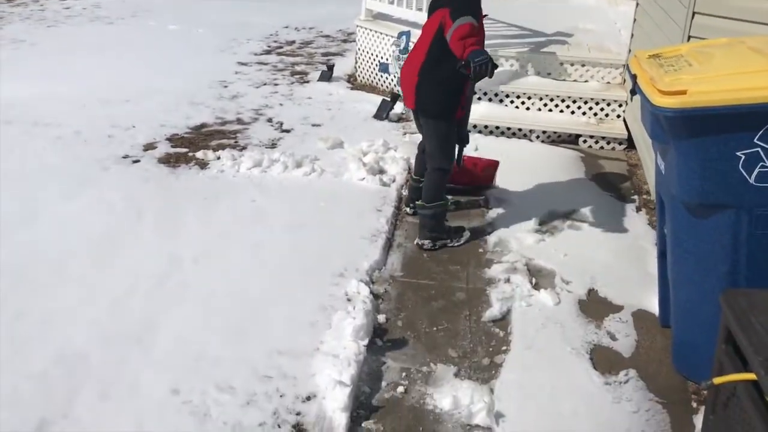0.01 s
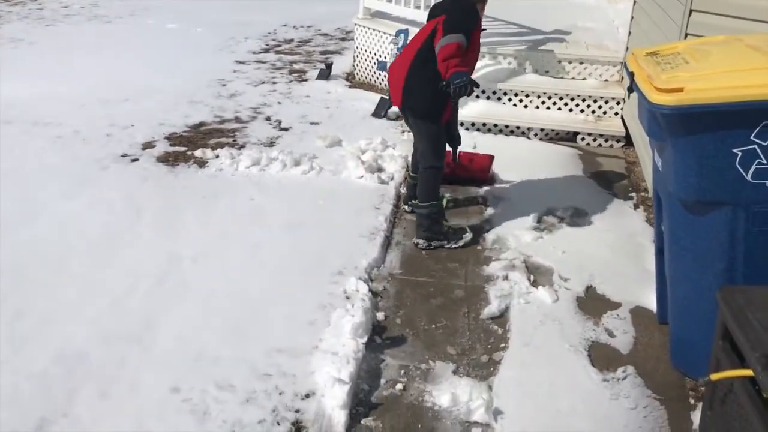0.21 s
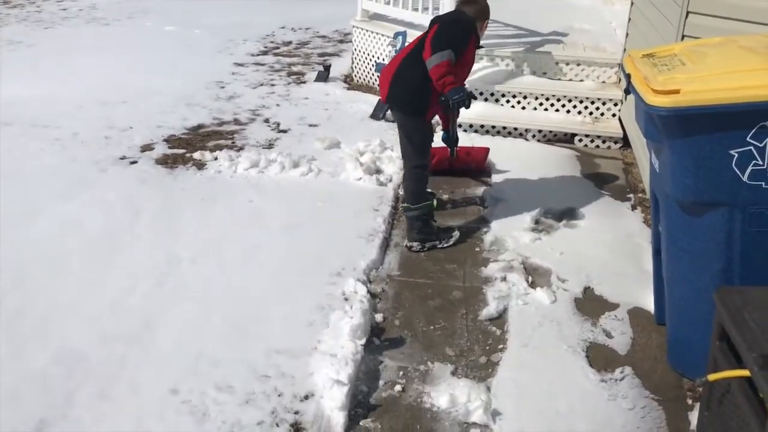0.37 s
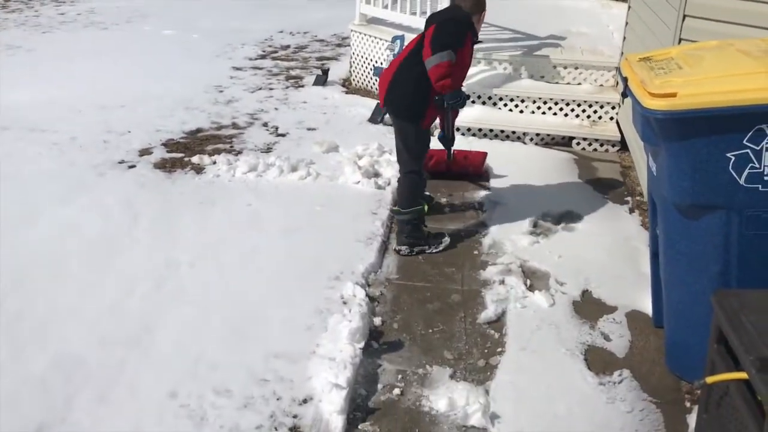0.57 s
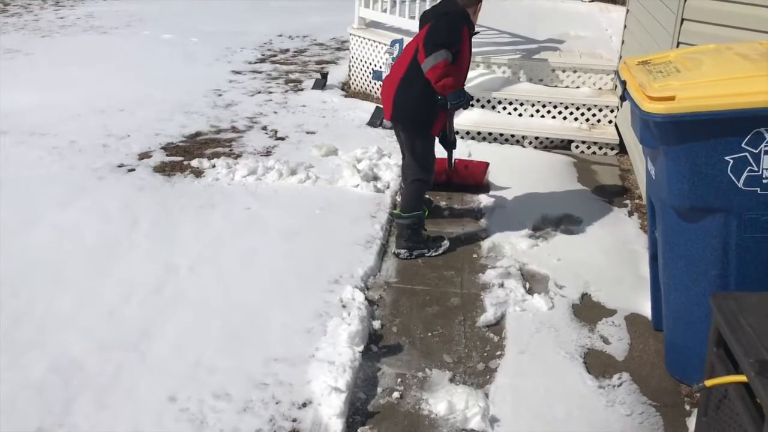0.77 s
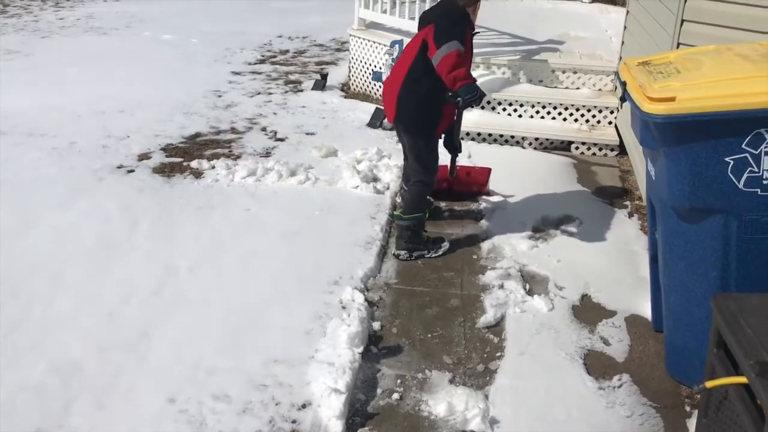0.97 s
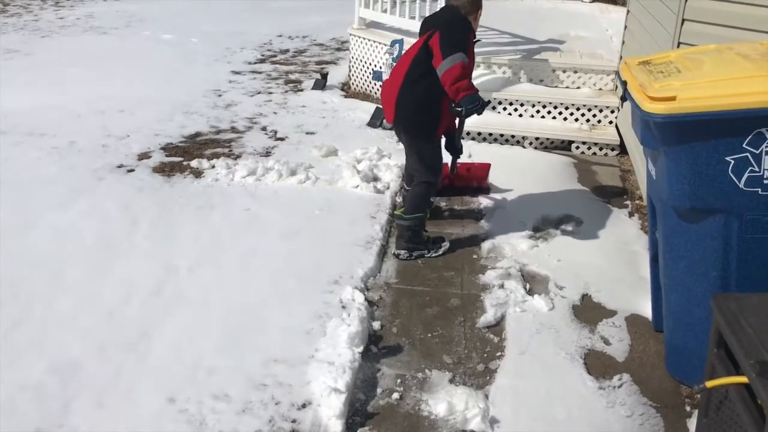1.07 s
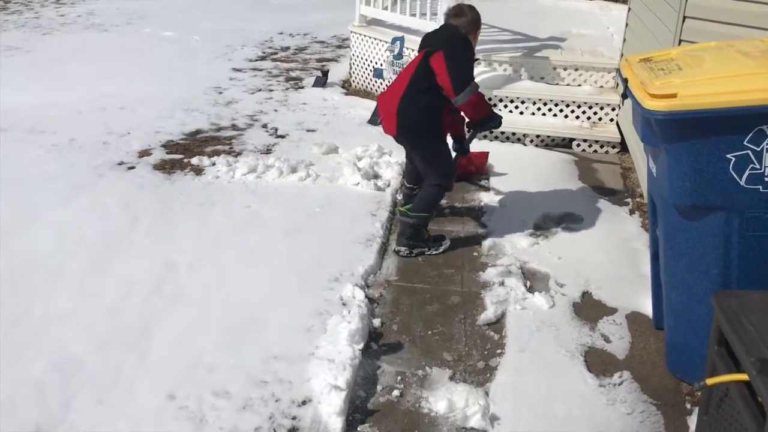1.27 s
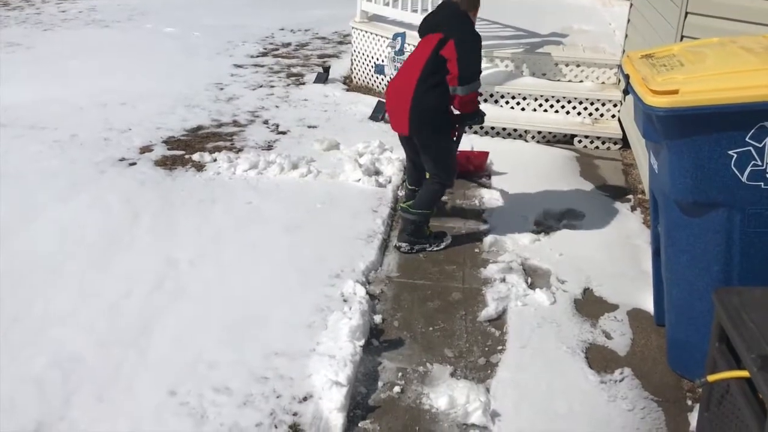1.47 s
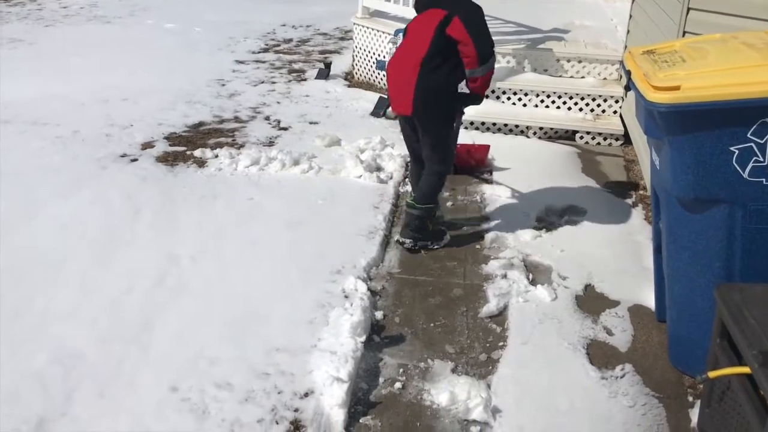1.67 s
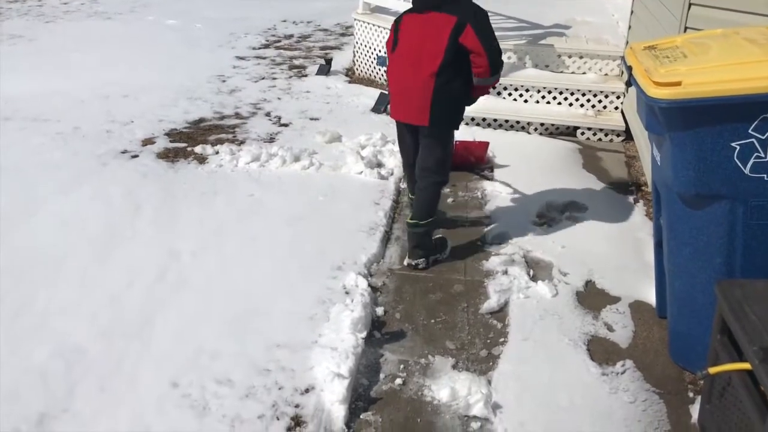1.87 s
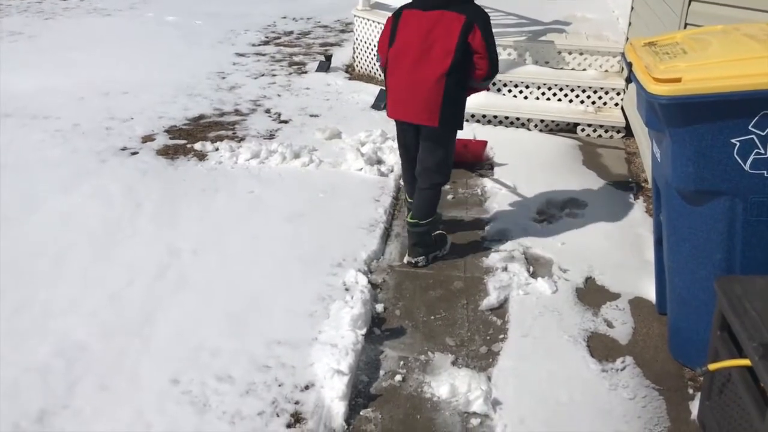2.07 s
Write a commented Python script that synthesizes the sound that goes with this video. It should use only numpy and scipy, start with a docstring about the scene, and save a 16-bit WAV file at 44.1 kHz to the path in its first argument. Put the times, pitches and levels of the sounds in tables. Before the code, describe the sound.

A plastic snow shovel scrapes over gritty concrete from 0.2 to 0.5 seconds, knocking hollowly, with snow swishing off. It drags back lightly and clacks down around 0.9, then shoves again from 1.1 to 1.4. Faint sleeve rustle follows, with two soft boot crunches near 1.7 and 1.9. Light wind bumps the microphone over a faint outdoor wash, strongest from 1.6 to 1.9 seconds.

```python
"""A snowy concrete walk beside a house, with the microphone out in a light wind.
A plastic snow shovel is shoved twice over the walk, and drawn back and set down in between.
Its edge grates on grit and catches on bumps, ringing the scoop; snow swishes off it.
Then nylon sleeves brush a jacket and boots crunch. The house wall throws the sound back,
and gusts buffet the microphone over a faint, distant wash."""
import sys
import numpy as np
from scipy import signal
from scipy.fft import rfft, irfft
from scipy.io import wavfile
from scipy.ndimage import uniform_filter1d

SR = 44100
rng = np.random.default_rng(int(sys.argv[2]) if len(sys.argv) > 2 else 0)


def put_to_file(sound):
    """Save the sound as 16-bit audio at rate SR, in the file named by the first command-line argument."""
    columns = np.atleast_2d(sound).T  # one column per channel
    safe = np.clip(columns, -1, 1)
    whole_steps = np.round(safe * 32767)
    wavfile.write(sys.argv[1], SR, whole_steps.astype(np.int16))


N = 94815

# The plastic scoop's resonances. Each row: frequency in Hz, width in Hz, gain in dB.
SCOOP_MODES = [(255, 61, -2.5), (333.3, 56, 1.5), (408, 68, -8), (596.6, 30, -3), (680, 89, -1),
               (988, 64, 0.5), (1110, 65, -8.5), (1317, 180, -3), (1585, 81, -5), (1954, 120, -6.5),
               (2350, 60, -12.5), (3280, 340, -12.5), (4300, 450, -27), (5930, 2300, -20)]
# How hard the edge grates, one curve per move. Each point: time in seconds, level in dB.
SHOVEL_MOVES = [
    [(0, -49.5), (.028, -46), (.055, -50.5), (.08, -51), (.12, -74)],
    [(.152, -48.5), (.166, -43.5), (.198, -39), (.212, -33), (.245, -29), (.278, -27.5), (.3, -37),
     (.318, -23.5), (.342, -32), (.358, -26), (.375, -34), (.432, -37.5), (.448, -69), (.5, -73), (.6, -83)],
    [(.7, -54), (.745, -46.5), (.767, -40), (.785, -49), (.83, -44), (.875, -54), (.9, -35), (.925, -46),
     (.96, -34), (.992, -49), (1.006, -39.5), (1.025, -47.5), (1.07, -75)],
    [(1.08, -76), (1.092, -43.5), (1.11, -44.5), (1.125, -27.5), (1.148, -32.5), (1.18, -34), (1.203, -30),
     (1.22, -34), (1.237, -32.5), (1.258, -43.5), (1.288, -51), (1.3, -36.5), (1.328, -39.5), (1.355, -80)],
]
# Snow sliding off the scoop, and clothing. Each row: peak time, rise and fall in seconds, level in dB.
SWISHES = [(.015, 0.034, 0.046, -63.5), (0.389, 0.088, 0.039, -40), (0.509, 0.093, 0.053, -48.5),
           (.7, 0.14, 0.059, -57), (.83, 0.057, 0.072, -52), (1.28, 0.11, 0.061, -48),
           (1.5, 0.11, 0.067, -57.5), (1.62, 0.039, .04, -60), (1.8, 0.16, 0.058, -59),
           (2.15, 0.065, .05, -58)]
# Wind on the microphone. Each row: peak time, rise and fall in seconds, pitch in Hz, level in dB.
BUFFETS = [(.095, .02, 0.0091, 62.7, -44.5), (0.258, .012, 0.018, 68.4, -40.5),
           (.805, 0.0097, 0.01, 125, -42.5), (.82, 0.018, 0.01, 55.4, -41),
           (0.899, 0.008, 0.021, 86.1, -39), (1.04, 0.022, 0.015, 78.1, -54),
           (1.374, 0.029, 0.02, 55, -38.5), (1.52, 0.026, .02, 64.6, -50.5),
           (1.605, 0.0029, 0.014, 77.9, -29.5), (1.75, 0.11, 0.069, 62.44, -41.5),
           (1.836, 0.023, 0.04, 63.24, -29.5), (1.939, 0.023, 0.025, 69.8, -43),
           (2.108, 0.017, .014, 50.94, -40.5)]
# The edge catches or lands; where it is struck decides which resonances answer.
# Each row: start and contact decay in seconds, then thud, hollow, ring, clack and crack in dB.
KNOCKS = [(0.2066, 0.0068, -45, -47, -34.5, -32, -50), (.2505, 0.0038, -33.5, -27, -34, -34, -31),
          (0.2523, 0.0017, -25, -25, -26, -28.5, -35.5), (0.268, 0.0098, -49, -38, -29, -29.5, -56),
          (0.282, 0.0037, -32.5, -44, -45, -45, -52), (0.3114, 0.0051, -52, -26.5, -37, -50, -34),
          (.318, 0.0053, -23, -22.5, -34.5, -27.5, -57), (0.358, 0.0027, -36, -37.5, -55, -49, -46),
          (0.489, 0.0073, -46, -73, -66, -61, -66), (.765, .003, -47, -37, -45.5, -55, -63),
          (0.9357, 0.002, -57, -50, -22, -24.5, -33), (1.002, 0.0054, -43, -47, -42, -62, -49),
          (1.1208, .003, -30.5, -28, -41, -43, -62), (1.131, 0.011, -38, -35, -29.5, -26, -42),
          (1.1415, .004, -42, -40, -40, -28, -34.5), (1.145, 0.0028, -20.5, -32.5, -38, -26, -52),
          (1.17, .003, -42, -32.5, -36.5, -46, -52), (1.196, 0.0048, -45, -36, -47, -32, -49),
          (1.226, 0.017, -40.5, -40, -40.5, -47, -35), (1.297, 0.0037, -56, -47, -43.5, -50, -53),
          (1.604, 0.0036, -63, -70, -52, -52.5, -57)]
# The centres of thud, hollow, ring and clack, in Hz.
KNOCK_ZONES_HZ = [313, 683, 1056, 1760]
# Sleeves brushing the jacket. Each row: peak time, rise and fall in seconds, level in dB.
SLEEVE_BRUSHES = [(1.59, 0.041, 0.1, -59), (1.81, 0.034, 0.074, -63)]
# Boots in snow. Each row: peak time, rise and fall in seconds, crust and packing levels in dB.
BOOT_CRUNCHES = [(1.691, 0.0066, 0.014, -43.5, -58), (1.711, 0.013, 0.021, -51.5, -47.5),
                 (1.864, 0.0035, 0.03, -49.5, -64), (1.898, .012, 0.042, -51.5, -62)]

# The tone of each noise. Each row: frequency in Hz, relative level in dB.
GRIT_SPECTRUM = [(150, -16), (500, 15.5), (1800, 3), (2700, -2.5), (3500, -3), (5000, -10), (7000, -5),
                 (8300, -14), (10300, -20), (12500, -8.5), (16000, -27)]  # grit breaking under the edge
SWISH_SPECTRUM = [(200, -31), (800, 3.5), (1900, 6), (3000, 1), (7000, -0.5), (10300, -4.5), (12700, -0.5),
                  (16000, -8)]  # sliding snow
WASH_SPECTRUM = [(100, -3), (300, -3.5), (600, -1.5), (1000, -8.5), (1700, -8.5), (2600, -18),
                 (6000, -19.5), (16000, -28)]  # the distant outdoors
RUMBLE_SPECTRUM = [(15, -24), (35, -1.5), (62, -2.5), (100, -6.5), (200, -19.5), (500, -73), (2000, -86)]  # the breeze on the microphone
EDDY_SPECTRUM = [(20, 2), (60, 3.5), (150, -1), (230, -13.5), (400, -33), (2000, -56)]  # turbulence within a buffet
NYLON_SPECTRUM = [(2000, -34), (8000, -10), (12500, 1), (16000, -9)]  # sleeve on jacket
CRUST_SPECTRUM = [(150, -16), (500, -7), (900, -3.5), (1600, 1), (2700, -4), (3800, -1.5), (7000, -7),
                  (10300, -12), (12500, -11), (16000, -17)]  # snow crust breaking
PACKING_SPECTRUM = [(100, -25), (260, -2), (550, -3), (900, 4), (1500, -7), (2600, -19), (16000, -43)]  # snow compacting under the sole

SCOOP_LOW_HZ = 159  # below this the scoop barely radiates
SCOOP_DIP_HZ, SCOOP_DIP_WIDTH_HZ = 2570, 130  # a gap between its resonances


def undb(db):
    """Decibels to amplitude."""
    return 10 ** (np.asarray(db) / 20)


def unit(x):
    """Scale to rms 1."""
    return x / np.sqrt(np.mean(x ** 2) + 1e-24)


def colour(x, spectrum):
    """Minimum-phase filter that follows (Hz, dB) points."""
    hz, db = np.array(spectrum).T
    bins_hz = np.maximum(np.fft.rfftfreq(2 * N, 1 / SR), 1)
    gain = undb(np.interp(np.log(bins_hz), np.log(hz), db))
    cepstrum = irfft(np.log(gain))
    cepstrum[1:N] *= 2
    cepstrum[N + 1:] = 0
    return irfft(rfft(x, 2 * N) * np.exp(rfft(cepstrum)))[:N]


def resonate(x, hz, width):
    """One resonance, gain 1 at its centre."""
    return signal.lfilter(*signal.iirpeak(hz, hz / width, fs=SR), x)


def band(x, hz, kind):
    """Third-order low- or high-pass."""
    return signal.sosfilt(signal.butter(3, hz, kind, fs=SR, output="sos"), x)


def wander(hz):
    """Smooth random drift with rms 1."""
    hold = int(SR / hz)
    steps = np.repeat(rng.standard_normal(N // hold + 1), hold)
    return unit(uniform_filter1d(steps, hold)[:N])


def swell(t, at, rise, fall):
    """A bell-shaped swell with its own rise and fall."""
    return np.exp(-((t - at) / np.where(t < at, rise, fall)) ** 2)


def grains(per_s, spread_db):
    """Dense tiny fractures of uneven size."""
    size = undb(spread_db * np.clip(rng.standard_normal(N), -2, 2))
    polarity = np.sign(rng.standard_normal(N))
    return size * polarity * (rng.random(N) < per_s / SR)


def scoop(force):
    """The plastic scoop rings with the force at its edge."""
    modes = sum(undb(db) * resonate(force, hz, width) for hz, width, db in SCOOP_MODES)
    ring = band(modes, SCOOP_LOW_HZ, "high")
    return ring - resonate(ring, SCOOP_DIP_HZ, SCOOP_DIP_WIDTH_HZ)


def scrape(t, full_push_db=-28):
    """The edge sticks and slips over grit; harder pressure rings the scoop more."""
    push = sum(undb(np.interp(t, *np.array(move).T, left=-200, right=-200)) for move in SHOVEL_MOVES)
    bite = (push / undb(full_push_db)) ** 0.13  # 0.13 dB of extra ring per dB of push
    chatter = grains(per_s=3500, spread_db=4) * undb(2.5 * wander(hz=110))
    ring = scoop(chatter * push * bite) / np.std(scoop(chatter))
    fractures = grains(per_s=9000, spread_db=5.9) * undb(1.4 * wander(hz=180))
    grit = unit(colour(fractures, GRIT_SPECTRUM))
    return undb(-3) * ring + undb(-6) * push * grit


def snow_swish(t):
    """Fine grains of snow slide off the scoop in soft swells, along with the swish of clothing."""
    level = sum(undb(db) * swell(t, at, rise, fall) for at, rise, fall, db in SWISHES)
    powder = grains(per_s=12000, spread_db=2) * undb(1.73 * wander(hz=77))
    return level * unit(colour(powder, SWISH_SPECTRUM))


def distant_wash(level_db=-58.5):
    """The outdoors, far off: a faint noise that barely wavers."""
    air = colour(rng.standard_normal(N), WASH_SPECTRUM)
    return undb(level_db) * unit(air * undb(0.38 * wander(hz=7.8)))


def wind(t, rumble_db=-53, freshen_db_per_s=7.5, eddy_db=-8.5):
    """Right at the microphone, eddies thump over the rumble of a freshening breeze."""
    breeze = undb(2 * wander(hz=6.65) + freshen_db_per_s * t)
    out = undb(rumble_db) * unit(colour(rng.standard_normal(N), RUMBLE_SPECTRUM) * breeze)
    eddies = undb(eddy_db) * unit(colour(rng.standard_normal(N), EDDY_SPECTRUM))
    for at, rise, fall, hz, db in BUFFETS:
        cycles = np.cumsum(hz * np.exp(0.1204 * wander(hz=90))) / SR + rng.random()
        thump = unit(np.sin(2 * np.pi * cycles))
        out += undb(db) * swell(t, at, rise, fall) * (thump + eddies)
    return out


def knocks(t, rise_s=0.00088, blow=0.64, width_scale=0.98, split_hz=2450):
    """Each catch is a blow and a short rattle: the scoop rings below the split, grit cracks above."""
    out = np.zeros(N)
    age = t[:SR // 4]
    energy = 0.01 * SR  # that of 10 ms at rms 1

    def burst(x):
        return x * np.sqrt(energy / np.sum(x ** 2))

    grit = band(colour(rng.standard_normal(N), GRIT_SPECTRUM), split_hz, "high")
    for at, decay, *zones_db, crack_db in KNOCKS:
        contact = (1 - np.exp(-age / rise_s)) * np.exp(-age / decay)
        ring = 0
        for k, (hz, width, db) in enumerate(SCOOP_MODES):
            force = burst(rng.standard_normal(len(age)) * contact)
            force[0] += (-1) ** k * blow * np.sqrt(energy)  # first contact, relative to the rattle
            struck_db = np.interp(np.log(hz), np.log(KNOCK_ZONES_HZ), zones_db)
            ring += undb(db + struck_db) * burst(resonate(force, hz, width * width_scale))
        start = int(at * SR)
        span = slice(start, start + len(age))
        crack = undb(crack_db) * burst(grit[span] * contact)
        out[span] += band(ring, split_hz, "low") + crack
    out -= resonate(out, SCOOP_DIP_HZ, SCOOP_DIP_WIDTH_HZ)
    return band(out, SCOOP_LOW_HZ, "high")


def sleeves(t):
    """Nylon rubs on nylon as the arms move: a thin, high hiss."""
    level = sum(undb(db) * swell(t, at, rise, fall) for at, rise, fall, db in SLEEVE_BRUSHES)
    return level * unit(colour(rng.standard_normal(N), NYLON_SPECTRUM))


def boots(t):
    """A boot breaks the crust and packs the snow beneath."""
    fractures = grains(per_s=5000, spread_db=4.4) * undb(2.1 * wander(hz=120))
    crust = unit(colour(fractures, CRUST_SPECTRUM))
    packing = unit(colour(grains(per_s=2500, spread_db=3.4), PACKING_SPECTRUM))
    return sum(swell(t, at, rise, fall) * (undb(crust_db) * crust + undb(packing_db) * packing)
               for at, rise, fall, crust_db, packing_db in BOOT_CRUNCHES)


def yard(direct, t, wall_s=0.015, wall_db=-18, t60_s=0.16, scatter_db=-19.5):
    """The house wall's echo travels about five metres further; a short, dull scatter follows."""
    echo = np.interp(t - wall_s, t, band(direct, 2350, "low"), left=0)
    decay = np.exp(-np.log(1000) * t / t60_s) * (t > wall_s)
    tail = band(rng.standard_normal(N), 6950, "low") * decay
    scatter = signal.fftconvolve(direct, tail / np.sqrt(np.sum(tail ** 2)))[:N]
    return direct + undb(wall_db) * echo + undb(scatter_db) * scatter


def scene():
    """One microphone in the yard: the shovelling and its echo, the wind and the distant wash."""
    t = np.arange(N) / SR
    shovelling = scrape(t) + snow_swish(t) + knocks(t) + sleeves(t) + boots(t)
    return (yard(shovelling, t) + distant_wash() + wind(t))[None]


def record(dry):
    """The recorder cuts the top steeply above 16.1 kHz."""
    return signal.sosfilt(signal.ellip(10, 0.2, 80, 16100, fs=SR, output="sos"), dry)


dry = scene()
out = record(dry)
put_to_file(out)
```